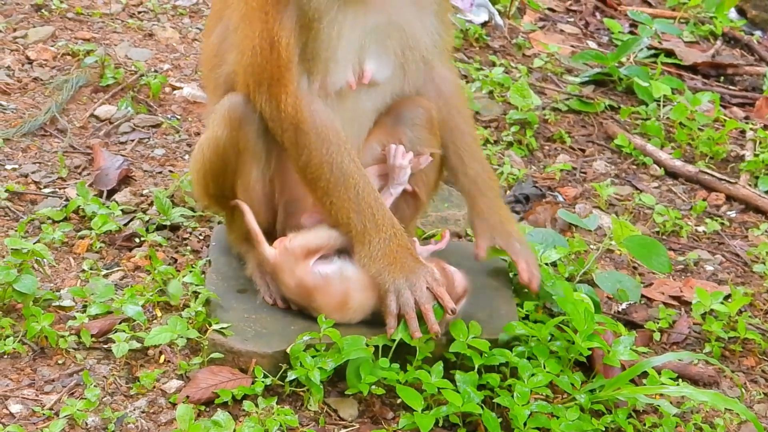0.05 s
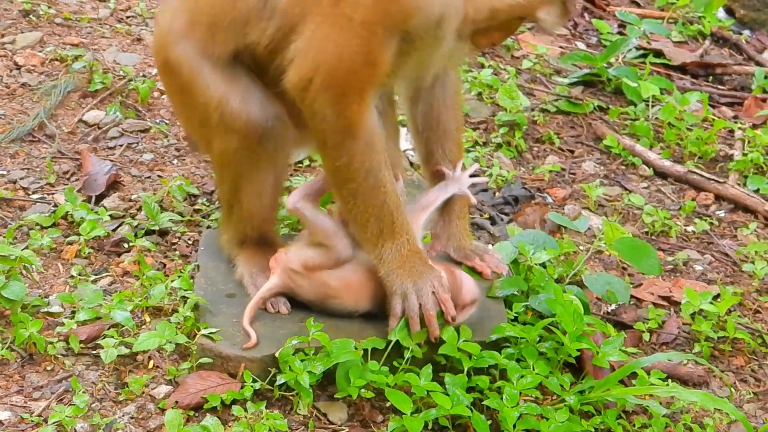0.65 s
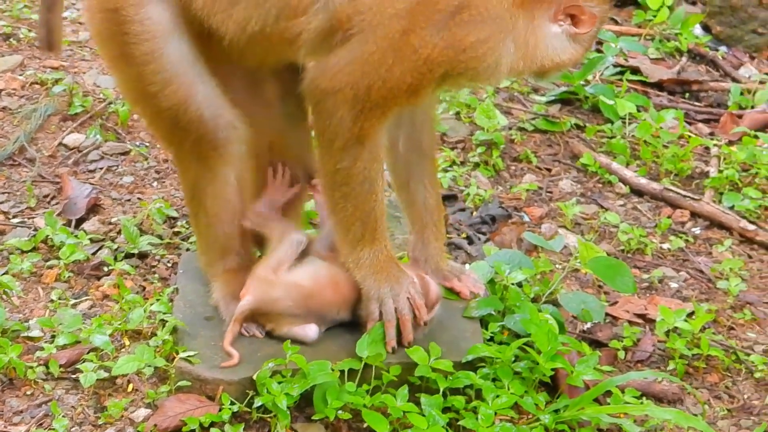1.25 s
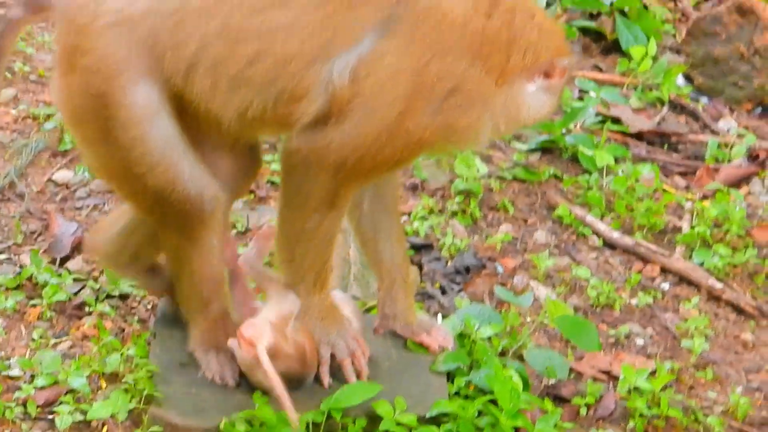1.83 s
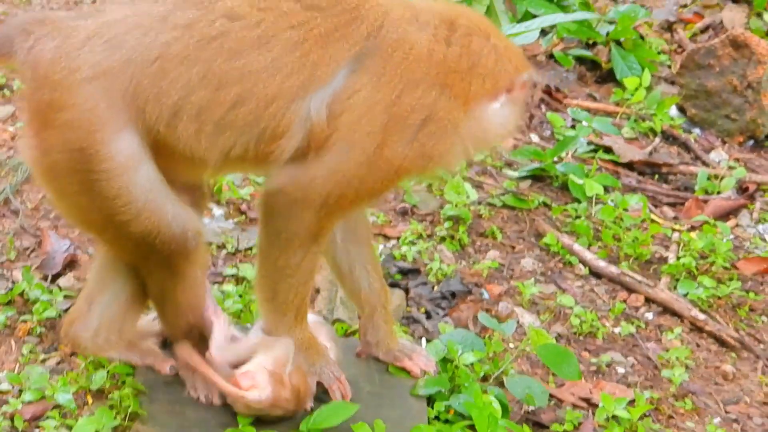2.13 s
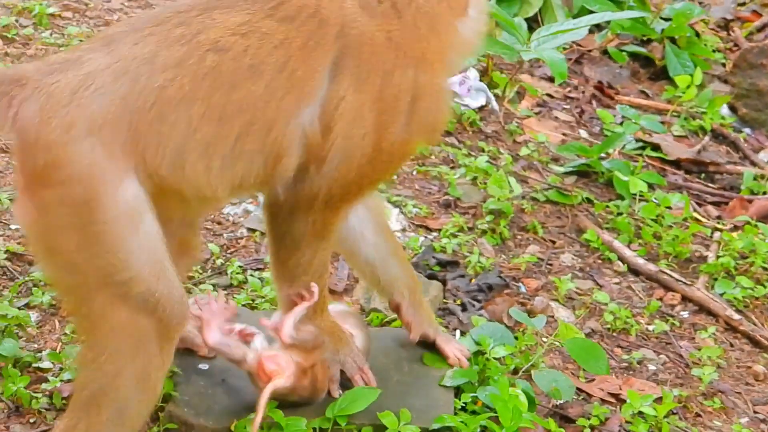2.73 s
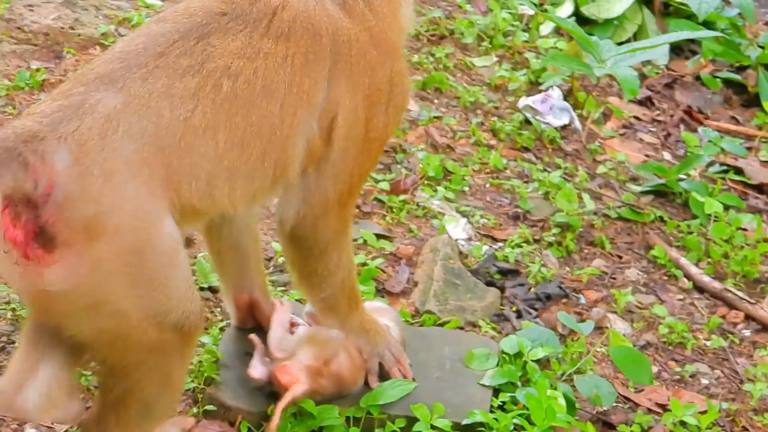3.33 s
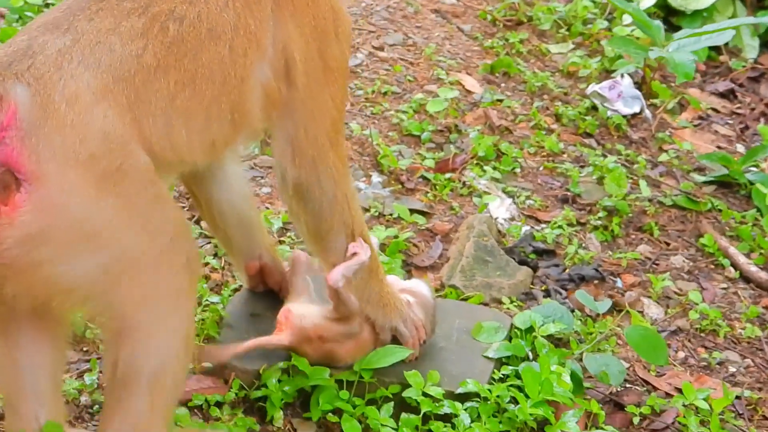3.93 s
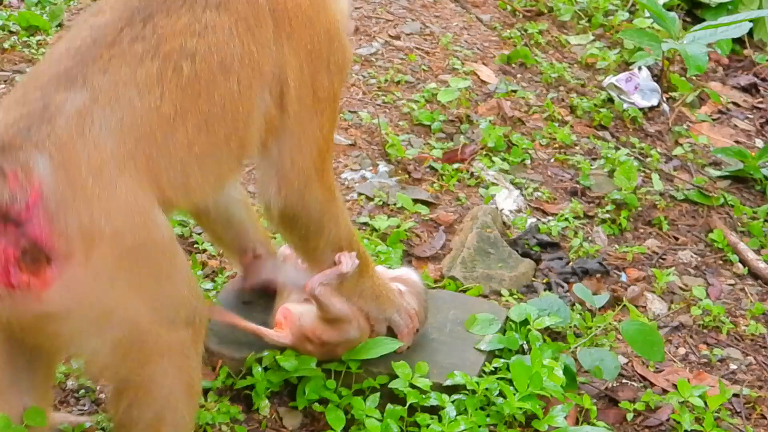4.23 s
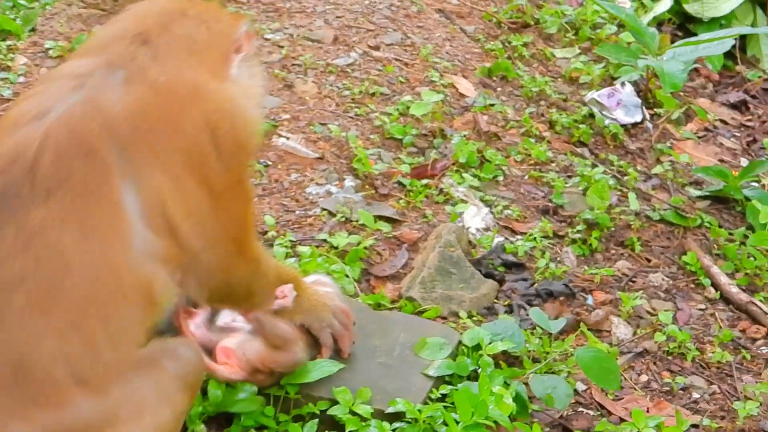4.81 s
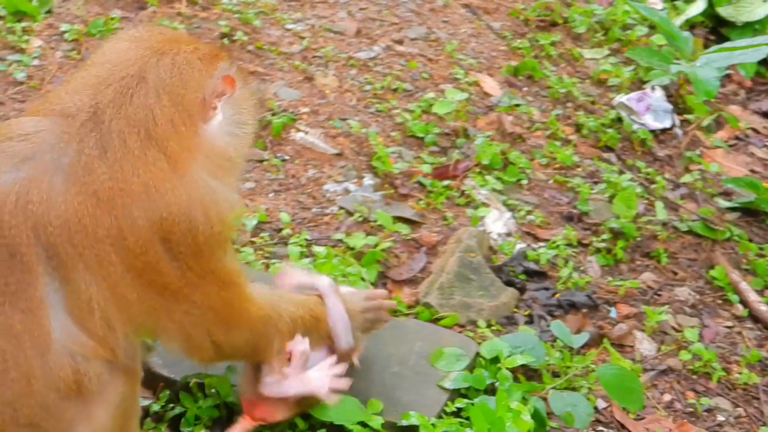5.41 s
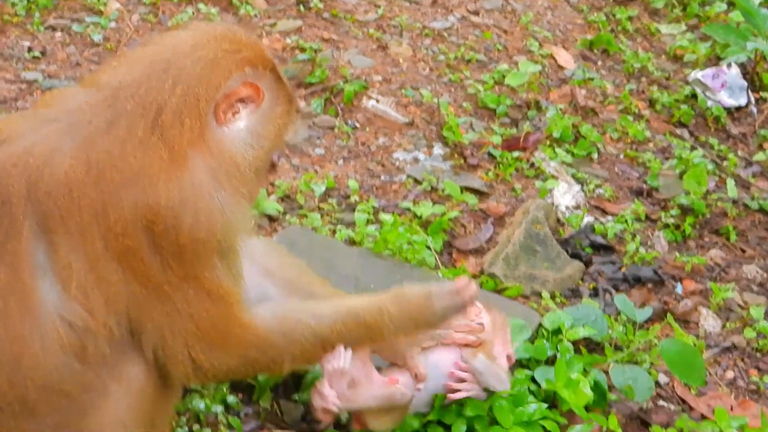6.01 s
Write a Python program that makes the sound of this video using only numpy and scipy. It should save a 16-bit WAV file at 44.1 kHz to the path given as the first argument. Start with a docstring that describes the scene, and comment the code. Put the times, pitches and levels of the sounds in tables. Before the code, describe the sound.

A baby monkey cries close by in a forest, over faint air and a steady high insect whine. A few tiny soft grunts come in the first second, with a shrill gliding squeak at about 0.6 seconds. A quick cluster of squeaks and thin whistles follows around 1.5, then single squeaks at 1.7 and 2.1. From about 2.7 seconds a scuffle grows: dry leaves rustle softly and limbs bump and scrape on stone, with one sharper knock at 4.6. Brief, often hoarse squeaks continue through it, the clearest near 3.0 and 4.0, weaker ones near 4.7, 4.9 and 5.4. A very faint distant note sounds around 5.1. At 5.6 and again at 6.0 seconds the baby lets out a short, harsh, piercing scream; these two are by far the loudest sounds. The trees give the cries a light echo.

```python
"""A forest floor: a baby macaque, pinned on a stone by an adult, squeaks and grunts, then screams twice.
Its vocal folds slip between a clear tone, sidebands and chaos; thin whistles break out at the edges.
Limbs bump and scrape the stone and stir dry leaves. Behind them lie a bed of distant air, a steady
insect shrill and one faint far-off note, and the trees return a light echo."""
import sys
import numpy as np
from scipy import signal
from scipy.fft import rfft, irfft, next_fast_len
from scipy.io import wavfile
from scipy.ndimage import uniform_filter1d

SR = 44100
rng = np.random.default_rng(int(sys.argv[2]) if len(sys.argv) > 2 else 0)


def store_pcm(level_fs):
    """Save levels as 16-bit WAV."""
    pcm = np.round(np.clip(level_fs, -1, 1) * 32767).astype(np.int16)
    wavfile.write(sys.argv[1], SR, np.atleast_2d(pcm).T)


N = 271635
TIME = np.arange(N) / SR
FFT_SIZE = next_fast_len(N + SR, real=True)
FREQ = np.maximum(np.fft.rfftfreq(FFT_SIZE, 1 / SR), 1)
LOW_CUT_HZ, TOP_HZ = 69.7, 15800

# tone of the distant forest air: freq_hz, gain_db
AIR_EQ = [(25, -30), (55, -48), (90, -15), (140, -3), (200, 6), (300, -0.5), (450, 0.5), (800, -1),
          (1500, -6.5), (3000, -10), (6000, -13), (9000, -54), (12000, -46), (16000, -48)]
# bands of the insect chorus: centre_hz, width_hz, level_db
INSECT_BANDS = [(3460, 170, -71.5), (4500, 620, -68), (5160, 490, -63), (6694, 290, -71),
                (10630, 1350, -80)]
# reverb tails of the bushes, then the trunks: send_db, build_s, t60_s, treble_edge_hz
TREE_TAILS = [(-12.5, 0.0021, 0.23, 6500), (-26, 0.011, 1, 3600)]
# tone of both tails: freq_hz, gain_db
ECHO_EQ = [(200, -26.5), (1000, -11), (3000, 5.5), (4500, 0), (7000, 6.5), (10000, 5.5), (16000, 27)]

# tone of dry leaves and grit: freq_hz, gain_db
LEAF_EQ = [(120, -11.5), (300, 1), (800, 3), (2000, 2.5), (3500, -2), (5500, -6), (8500, -11.5),
           (11000, -15.5), (13500, -29), (16000, -40)]
# the adult shifts its weight in the leaves: centre_s, half_length_s, level_db
SHUFFLES = [(0.401, 0.01, -51.5), (0.835, 0.01, -58), (2.74, 0.034, -51.5), (2.945, 0.065, -54.5),
            (3.643, 0.017, -55.5), (3.79, 0.012, -55), (4.073, 0.092, -63), (4.225, 0.082, -51.5),
            (4.486, 0.0067, -52), (4.955, 0.065, -49), (5.16, 0.21, -56), (5.517, 0.053, -52)]
# hands and feet drag over the stone: centre_s, half_length_s, level_db
SCRAPES = [(2.745, 0.04, -51.5), (2.931, 0.03, -47), (3.633, 0.02, -57), (3.777, 0.019, -48.5),
           (4.94, 0.023, -51.5)]
# tone of skin on stone: freq_hz, gain_db
SCRAPE_EQ = [(150, -22), (400, -0.5), (800, 3), (1250, 8), (1900, -1), (3200, -23), (8000, -38),
             (16000, -60)]
# limbs hit the stone and ground: start_s, ring_hz, peak_db
BUMPS = [(.925, 1250, -46.5), (1.665, 1200, -43.5), (2.749, 1124, -32.5), (2.763, 866, -33),
         (2.9176, 983, -40), (3.771, 870, -45), (4.5838, 695, -20.5), (4.5859, 306, -31.5),
         (4.5896, 660, -38), (5.1465, 860, -40.5)]

# soft grunts: centre_s, pitch_hz, level_db
GRUNTS = [(.196, 440, -39), (.637, 453, -45), (.838, 400, -48.5), (1.027, 443, -37.5), (4.055, 496, -47),
          (5.798, 558.3, -52)]
# whistles of the tightened folds: start_s, length_s, first_hz, middle_hz, last_hz, level_db, octave_db
WHISTLES = [(1.433, 0.023, 10340, 9780, 10000, -46, -25), (1.489, 0.078, 6300, 5390, 5600, -55, 12),
            (1.564, 0.015, 6650, 6870, 7000, -42.5, -3.5), (5.631, 0.007, 7250, 7800, 9600, -31.5, -12),
            (5.638, 0.015, 7620, 9670, 10650, -25.5, -16), (5.957, 0.035, 9200, 10900, 10100, -54, -36),
            (6, 0.025, 4430, 7440, 9200, -39.5, -12)]
# short squeaks (a share is a fraction of the length; roughness runs 0-1): start_s, length_s,
# first_hz, turn_hz, last_hz, roughness, turn_share, body_db, overtone_crest_share, overtone_db
SQUEAKS = [(0.392, 0.017, 2514, 2472, 2300, 0.05, 0.25, -61, 0.71, -48.5),
           (0.568, 0.07, 2738, 1979, 4310, 0.26, 0.32, -31.5, 0.63, -26),
           (1.193, 0.052, 2200, 1647, 1200, 0.4, 0.6, -47, 0.38, -61),
           (1.4202, 0.02, 4160, 4110, 4005, 0.02, 0.65, -52, 0.26, -36),
           (1.437, 0.011, 3020, 3076, 3725, 0.25, 0.331, -29, 0.7, -30),
           (1.445, 0.014, 3890, 4000, 4074, 0.19, 0.75, -33, 0.49, -17),
           (1.451, 0.052, 4130, 3950, 3700, 0.28, 0.2476, -38.5, 0.44, -26),
           (1.74, 0.093, 2980, 2860, 3899, 0.27, 0.36, -29.5, 0.7, -23),
           (2.083, 0.066, 3056, 2740, 3155, 0.05, 0.539, -26, 0.72, -31.5),
           (2.73, 0.065, 2735, 1910, 1704, 0.23, 0.58, -45, 0.58, -48),
           (2.950, 0.086, 2119, 1629, 3523, 0.2, 0.38, -34, 0.43, -35.5),
           (3.289, 0.035, 2000, 1620, 1450, 0.12, 0.49, -46.5, 0.6, -58),
           (3.968, 0.097, 2765, 3064, 3300, 0.57, 0.62, -26, 0.48, -30),
           (4.296, 0.045, 2448, 2300, 2145, 0.3, 0.5, -48, 0.56, -79),
           (4.677, 0.046, 2300, 2110, 1863, 0.36, 0.46, -39, 0.68, -38.5),
           (4.883, 0.07, 3100, 2000, 1290, 0.59, 0.74, -40.5, 0.77, -38),
           (5.422, 0.066, 3880, 2640, 3130, 0.17, 0.48, -39, 0.71, -36)]
# every squeak starts hoarse, clears, then breaks up: length_share, added_roughness
BREAK_UP = [(0, .4), (.35, .22), (.58, 0), (.76, .02), (1, .8)]
# envelopes of the two screams, one list each: time_s, body_db, overtone_db
SCREAM_LEVELS = [
    [(5.614, -43.5, -66), (5.638, -32.5, -40), (5.66, -16, -17), (5.684, -10, -23.5), (5.696, -18.5, -23.5),
     (5.754, -16, -28.5), (5.786, -21.5, -36.5), (5.803, -30.5, -46)],
    [(6.024, -40, -47), (6.038, -23, -30), (6.05, -16, -26), (6.09, -14, -20), (6.116, -14.5, -25),
     (6.132, -21.5, -36), (6.14, -15, -36), (6.156, -28.5, -45)],
]
# each scream shoots up, sags, recovers and falls away: time_s, pitch_hz
SCREAM_PITCH = [
    [(5.614, 2260), (5.647, 4582), (5.684, 4246), (5.725, 4505), (5.77, 4453), (5.803, 3880)],
    [(6.024, 3773), (6.038, 4930), (6.064, 3853), (6.1, 4103), (6.121, 4480), (6.156, 3040)],
]
# the screaming folds lock into a clearer tone: centre_s, half_length_s, share_of_roughness_lost
FOLD_LOCKS = [(5.623, .017, .97), (5.682, .007, .8), (5.752, .018, .7), (6.049, .006, .6),
              (6.092, .01, .55), (6.134, .012, .82)]
# mouth resonances for the early, the low and weak, and the hoarse late squeaks: freq_hz, gain_db
NARROW_MOUTH = [(300, -31.5), (1100, -6), (1900, -11.5), (3000, -0.5), (3800, -7), (4600, -7.5),
                (5500, -6.5), (6500, -4.5), (8300, 12.5), (9300, 7), (10500, 9), (12200, -5), (13200, -8.5),
                (16000, -18)]
LOW_MOUTH = [(300, -16), (1400, -2), (2000, -0.5), (3000, 3), (4500, 5), (6500, 2), (8600, 11.5),
             (10500, 2), (12400, -1), (13400, -8), (16000, -21)]
LOOSE_MOUTH = [(300, -35), (1400, -5.5), (2100, 10), (3000, 9.5), (4000, 13.5), (5200, 4.5), (6800, -2.5),
               (8600, 6), (10000, 5.5), (12400, 4), (13400, -4), (16000, -17)]
# open-mouth resonances for the first and the second scream: freq_hz, gain_db
FIRST_MOUTH = [(300, -53), (1750, -29.5), (2300, -12.5), (3700, -8.5), (4400, -4), (5600, -2.5), (6900, 5),
               (7700, 14.5), (8600, 4), (10500, 2.5), (11700, -2), (12800, -8), (16000, -32)]
SECOND_MOUTH = [(300, -36), (2100, -19.5), (2700, -4), (3700, 5), (4400, 2.5), (5200, 1), (5900, -6.5),
                (6800, 6), (7600, -14.5), (10000, -12.5), (12200, -21.5), (13300, -30), (16000, -39)]
# the mouth takes a new shape between cries: start_s, resonance_table
MOUTH_SHAPES = [(0, NARROW_MOUTH), (2.5, LOW_MOUTH), (3.5, LOOSE_MOUTH), (4.5, LOW_MOUTH),
                (5.2, LOOSE_MOUTH), (5.55, FIRST_MOUTH), (5.9, SECOND_MOUTH)]


def undb(db):
    """Decibels to gain."""
    return 10 ** (np.asarray(db) / 20)


def unit(x):
    """Scale to rms 1."""
    return x / np.sqrt(np.mean(x ** 2))


def steady(x):
    """Ride the level to rms 1 while keeping the fast flutter."""
    return x / np.sqrt(uniform_filter1d(x ** 2, size=400) + 1e-12)


def filtered(x, gain):
    """Apply a gain at every frequency."""
    return irfft(rfft(x, FFT_SIZE) * gain, FFT_SIZE)[:len(x)]


def eq(x, points):
    """Equalise through (freq_hz, gain_db) points joined on a log-frequency axis."""
    hz, db = np.transpose(points)
    return filtered(x, undb(np.interp(np.log(FREQ), np.log(hz), db)))


def noise():
    """White noise."""
    return rng.standard_normal(N)


def wander(hz):
    """Random modulator of rms 1 that moves up to about hz times a second."""
    return unit(np.interp(2 * hz * TIME, np.arange(N), noise()))


def cycle(hz):
    """Running phase of a pitch curve."""
    return 2 * np.pi * np.cumsum(hz) / SR


def bell(t, centre, half_length):
    """Gaussian swell that peaks at 1."""
    return np.exp(-.5 * ((t - centre) / half_length) ** 2)


def window(start_s, end_s, fade_s):
    """A gate open from start to end, with linear fades outside."""
    return np.clip(1 + np.minimum(TIME - start_s, end_s - TIME) / fade_s, 0, 1)


def arc(share, turn, first, middle, last, curve):
    """Pitch or level contour: leave first, linger on middle at the turn, move on to last."""
    offset = np.interp(share, [0, turn, 1], [-1, 0, 1])
    return middle + (np.where(offset < 0, first, last) - middle) * np.abs(offset) ** curve


def spread(mid, side, side_db):
    """Mid and side to left and right."""
    return mid + undb(side_db) * side * np.array([[1], [-1]])


def forest(air_db=-59, pan_db=1.6):
    """The bed: far-off air and an insect chorus whose shrill bands merge into a steady whine."""
    air = spread(unit(eq(noise(), AIR_EQ)), unit(eq(noise(), AIR_EQ)), side_db=-18.5)
    out = air * undb(air_db + .5 * wander(2.1) + np.array([[pan_db], [-pan_db]]) / 2)
    for hz, width_hz, db in INSECT_BANDS:
        band = np.exp(-2 * np.log(2) * ((FREQ - hz) / width_hz) ** 2)
        mid, side = (unit(filtered(noise(), band)) for _ in range(2))
        out += undb(db + 1.4 * wander(18)) * spread(mid, side, side_db=2)
    return out


def far_note(centre_s=5.12, hz=1290, half_length_s=0.054, fall_per_s=.25, db=-59):
    """A faint, slightly falling note from far off."""
    t = np.clip(TIME - centre_s, -1, 1)
    tone = np.sqrt(2) * np.sin(cycle(hz * np.exp(-fall_per_s * t)))
    return undb(db) * tone * bell(t, 0, half_length_s)


def tree_echo(x):
    """Bushes scatter the sound at once; trunks return a longer, faint tail, different in each ear."""
    t = TIME[:SR]
    tails = 0
    for db, build_s, t60_s, edge_hz in TREE_TAILS:
        envelope = undb(db) * unit(undb(-60 * t / t60_s) * (1 - np.exp(-t / build_s))) / np.sqrt(SR)
        damping = 1 / np.hypot(1, (FREQ / edge_hz) ** 2)
        tails += np.array([filtered(envelope * rng.standard_normal(SR), damping) for _ in range(2)])
    return np.array([signal.fftconvolve(x, eq(tail, ECHO_EQ))[:N] for tail in tails])


def stone_reflections(x, t60_s=0.0225, build_s=0.00088):
    """The direct sound, widened by first bounces off stone and ground that differ at the two ears."""
    t = TIME[:SR // 10]
    envelope = undb(-60 * t / t60_s) * (1 - np.exp(-t / build_s))
    bounces = unit(envelope * rng.standard_normal(len(t))) / np.sqrt(len(t))
    reflected = signal.fftconvolve(x, bounces)[:N]
    side = eq(reflected, [(300, -9), (2500, -7.5), (4500, -1.5), (8000, 2.5), (13000, 3)])
    return spread(x, side, side_db=-7.5)


def leaf_litter(clicks_per_s=900, accent_db=6, floor_db=-69.5):
    """Dry leaves and grit give way in dense tiny clicks over a soft brushing, swelling at each shuffle."""
    def crackle():
        clicks = (rng.random(N) < clicks_per_s / SR) * noise()
        clicks *= undb(accent_db * np.minimum(rng.exponential(size=N), 2.2))
        return unit(eq(0.45 * unit(clicks) + noise(), LEAF_EQ))

    # the two fades overlap into one broad swell that peaks at 4 s
    stirring = undb(-51.5) * window(4.5, 3.5, fade_s=2.55)
    shuffle_power = sum((undb(db) * bell(TIME, s, half_s)) ** 2 for s, half_s, db in SHUFFLES)
    level = np.sqrt(undb(floor_db) ** 2 + stirring ** 2 + shuffle_power)
    flicker = undb(1.5 * wander(25))
    return level * flicker * spread(crackle(), crackle(), side_db=-5)


def scrapes(slip_hz=105, accent_db=2, jerk_decay_s=0.00061, drag=.45):
    """Skin sticks and slips on the stone in uneven jerks, with a dry drag between them."""
    timing, accent = rng.standard_normal((N // 100, 2)).T
    slips = (np.cumsum(np.exp(.3 * timing) / slip_hz) * SR).astype(int)
    impulses = np.bincount(slips[slips < N], undb(accent_db * accent[slips < N]), N)
    jerks = signal.fftconvolve(impulses, np.exp(-TIME[:SR // 100] / jerk_decay_s))[:N]
    pressure = sum(undb(db) * bell(TIME, s, half_s) for s, half_s, db in SCRAPES)
    return pressure * unit(eq((unit(jerks) + drag) * noise(), SCRAPE_EQ))


def bumps(contact_s=0.0015, scuff=0.016):
    """Soft blows of limbs: the push builds over the contact time and dies within a few cycles."""
    out = np.zeros(N)
    grit = unit(eq(noise(), LEAF_EQ))
    for start_s, hz, db in BUMPS:
        t = np.maximum(TIME - start_s, 0)
        push = (t / contact_s * np.exp(1 - t / contact_s)) ** 2
        out += undb(db) * push * (np.sin(2 * np.pi * hz * t) + scuff * grit)
    return out


def grunts(half_length_s=0.0049, fall_per_s=7.5, huff=0.34):
    """A few cycles of a low, falling tone, led by a small huff."""
    out = np.zeros(N)
    breath = unit(eq(noise(), [(200, -26), (900, 18), (1600, 9.5), (3000, -3), (8000, -24), (16000, -60)]))
    for centre_s, hz, db in GRUNTS:
        t = np.clip(TIME - centre_s, -.1, .1)
        tone = np.sqrt(2) * np.sin(cycle(hz * np.exp(-fall_per_s * t))) * bell(t, 0, half_length_s)
        out += undb(db) * (tone + huff * breath * bell(t, -half_length_s, half_length_s))
    return out


def whistles():
    """A second, much higher oscillation of the vocal folds, nearly a pure tone."""
    out = np.zeros(N)
    waver = 1 + 0.0194 * wander(490)
    breath = 0.27 * unit(eq(noise(), [(3000, -20), (7000, -6), (11500, -1.5), (16000, -12)]))
    for start_s, length_s, first_hz, middle_hz, last_hz, db, octave_db in WHISTLES:
        gate = window(start_s, start_s + length_s, fade_s=0.0026)
        on = gate > 0
        share = (TIME[on] - start_s) / length_s
        hz = np.polyval(np.polyfit([0, .5, 1], [first_hz, middle_hz, last_hz], 2), share)
        phase = cycle(hz * waver[on])
        octave = undb(octave_db) * (np.sin(2 * phase) * (hz < TOP_HZ / 2) + breath[on])
        envelope = gate[on] * undb(db + arc(share, 0.96, -2.3, 0, -4.4, curve=6))
        out[on] += np.sqrt(2) * envelope * (np.sin(phase) + breath[on] + octave)
    return out


def vocal_folds(on, hz, roughness, jitter, beat_ratio, sidebands, knee, rasp, hiss, rolloff, even_db):
    """The rougher the folds run, the more they jitter, beat against a slower vibration and hiss."""
    def drift(rate_hz):
        return wander(rate_hz)[on]

    hz, strain = hz[on], roughness[on]
    phase = cycle(hz * (1 + jitter * strain * drift(450) + 0.00627 * drift(120)))
    # nearly symmetric folds favour the odd harmonics: even_db turns down the rest
    harmonics = sum(np.exp(1j * k * phase) * (k * hz < TOP_HZ) * (1 if k % 2 else undb(even_db))
                    / k ** rolloff for k in np.arange(1, 9))
    # the slower vibration puts sidebands around each harmonic, stronger above, each coming and going
    beating = sum((.8 + .5 * drift(70)) * np.exp(1j * k * beat_ratio * phase)
                  * undb(-5 * (k < 0)) / abs(k) for k in (-2, -1, 1, 2))
    # as the tone breaks up, it smears into a band of noise
    core = 1 - 0.82 * strain + rasp * strain * (drift(420) + 1j * drift(420))
    source = np.zeros(N)
    source[on] = np.imag(harmonics * (core + sidebands * np.tanh(strain / knee) * beating))
    # air breaks through once a cycle
    source[on] += hiss * strain ** 0.75 * noise()[on] * (1 + 1.2 * np.sin(phase))
    return source


def mouth(source):
    """Each cry rings in the mouth shape of its moment."""
    shape = np.searchsorted([s for s, _ in MOUTH_SHAPES], TIME, side="right") - 1
    parts = [(source * (shape == k), points) for k, (_, points) in enumerate(MOUTH_SHAPES)]
    return sum(eq(part, points) for part, points in parts if part.any())


def cry_dynamics(voice, roughness, body_db, overtone_db, flutter_db, crossover_hz=5800):
    """Body and overtones follow separate envelopes; the level flutters as the voice roughens."""
    body = filtered(voice, 1 / (1 + (FREQ / crossover_hz) ** 20))
    flutter = undb(flutter_db * (roughness * wander(220) - roughness ** 2 / 4))
    return flutter * (steady(body) * undb(body_db) + steady(voice - body) * undb(overtone_db))


def squeaks(catch_db=7, catch_delay_share=0.16, catch_half_share=0.054):
    """Short gliding cries: the body is fullest at the pitch turn, the overtones have their own crest."""
    gate, total_weight, controls = np.zeros(N), np.full(N, 1e-18), np.zeros((4, N))
    for start_s, length_s, first_hz, turn_hz, last_hz, rough, turn, body_db, crest, over_db in SQUEAKS:
        opening = window(start_s, start_s + length_s, fade_s=.003)
        on = opening > 0
        share = (TIME[on] - start_s) / length_s
        # just after the turn the voice catches as it changes register
        dip_db = catch_db * bell(share, turn + catch_delay_share, catch_half_share)
        low_db = body_db + arc(share, turn, -17.7, 0, -14.4, curve=1.26) - dip_db
        high_db = over_db + arc(share, crest, -40.3, 0, -11.4, curve=2.3) - dip_db
        hz = arc(share, turn, first_hz, turn_hz, last_hz, curve=1.7)
        roughness = rough + np.interp(share, *np.transpose(BREAK_UP))
        # where two squeaks touch, the stronger leads
        weight = opening[on] ** 2 * (undb(low_db) + undb(high_db))
        controls[:, on] += weight * np.array([hz, roughness, low_db, high_db])
        total_weight[on] += weight
        gate = np.maximum(gate, opening)
    hz, roughness, low_db, high_db = controls / total_weight
    roughness = np.clip(roughness, 0, 1)
    source = vocal_folds(gate > 0, hz, roughness, jitter=.045, beat_ratio=.27, sidebands=.6,
                         knee=.8, rasp=.85, hiss=.24, rolloff=2.0, even_db=-5)
    return gate * cry_dynamics(mouth(source), roughness, low_db, high_db, flutter_db=3.6)


def screams(full_roughness=.9):
    """Two harsh, open-mouthed cries: the folds run chaotic, except for the moments when they lock."""
    gate = sum(window(rows[0][0], rows[-1][0], fade_s=.003) for rows in SCREAM_LEVELS)
    times, *levels = np.vstack(SCREAM_LEVELS).T
    body_db, overtone_db = (np.interp(TIME, times, db) for db in levels)
    hz = np.interp(TIME, *np.vstack(SCREAM_PITCH).T)
    clarity = sum(share * bell(TIME, s, half_s) for s, half_s, share in FOLD_LOCKS)
    roughness = np.clip(full_roughness * (1 - clarity), 0, 1)
    source = vocal_folds(gate > 0, hz, roughness, jitter=.055, beat_ratio=.255, sidebands=.55,
                         knee=.3, rasp=.5, hiss=.75, rolloff=2.3, even_db=0)
    return gate * cry_dynamics(mouth(source), roughness, body_db, overtone_db, flutter_db=2.3)


def scene():
    """The baby up front, the scuffle around it and the forest behind."""
    close = squeaks() + screams() + whistles() + grunts() + bumps() + scrapes()
    return stone_reflections(close) + tree_echo(close) + leaf_litter() + forest() + far_note()


def record(dry):
    """A gentle low cut thins the bass and a steep high cut takes off the top."""
    thinned = signal.sosfilt(signal.butter(2, LOW_CUT_HZ, "high", fs=SR, output="sos"), dry)
    return signal.sosfilt(signal.ellip(10, .2, 80, TOP_HZ, fs=SR, output="sos"), thinned)


dry = scene()
out = record(dry)
store_pcm(out)
```